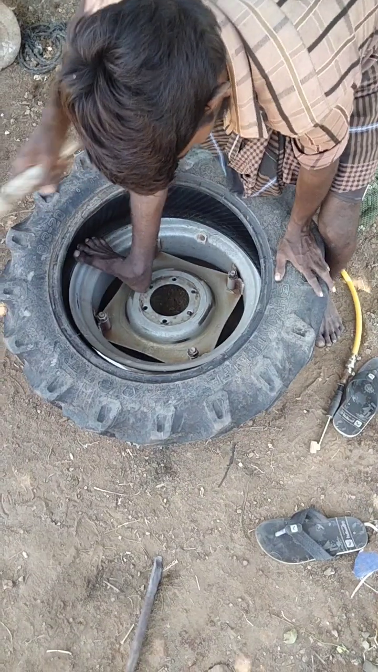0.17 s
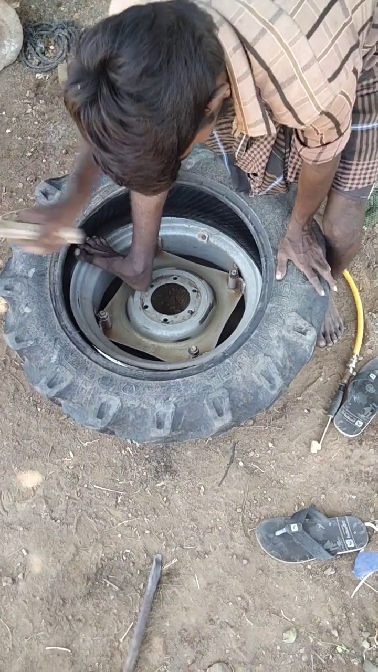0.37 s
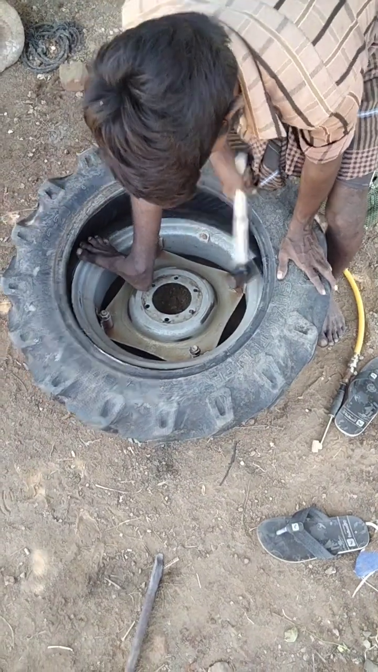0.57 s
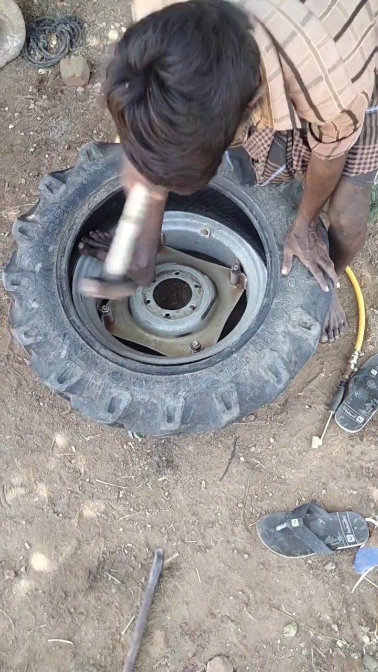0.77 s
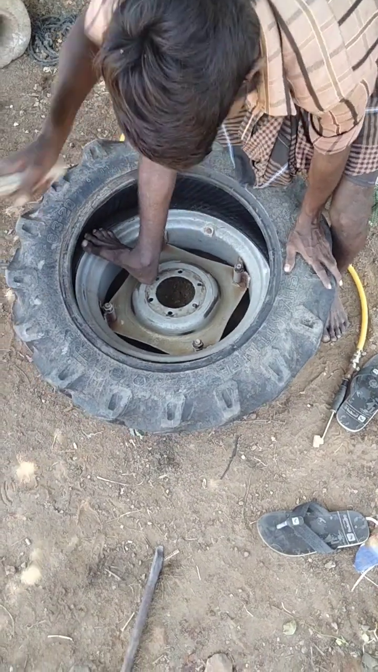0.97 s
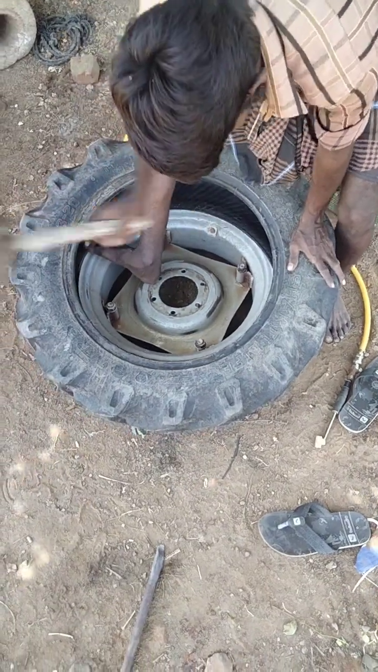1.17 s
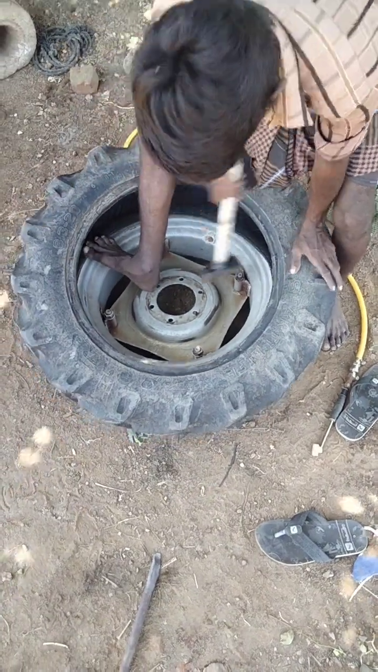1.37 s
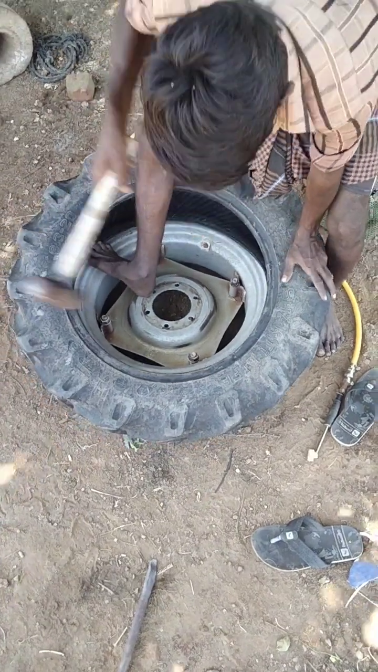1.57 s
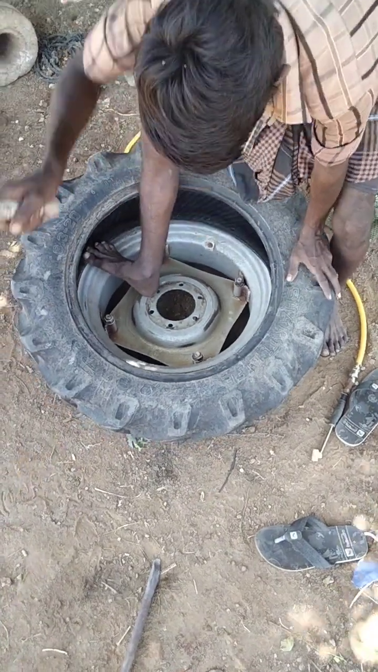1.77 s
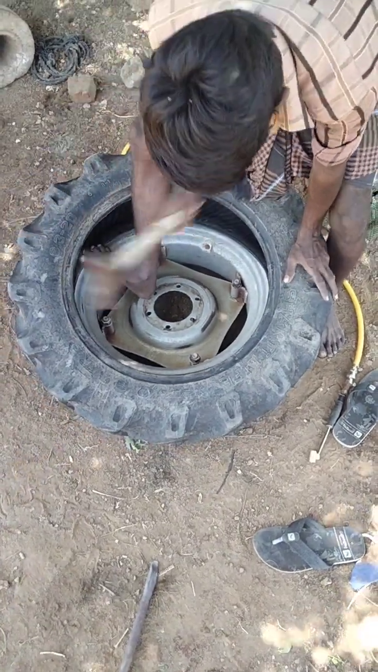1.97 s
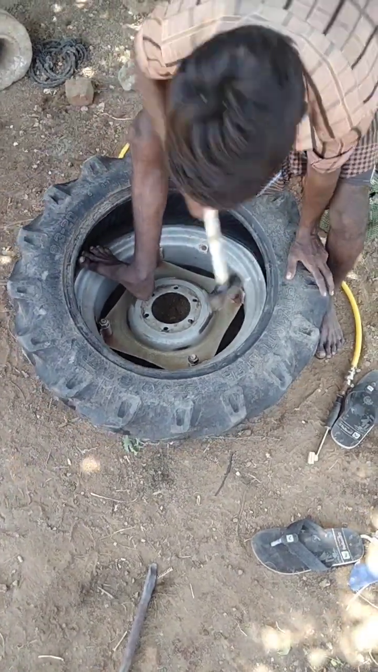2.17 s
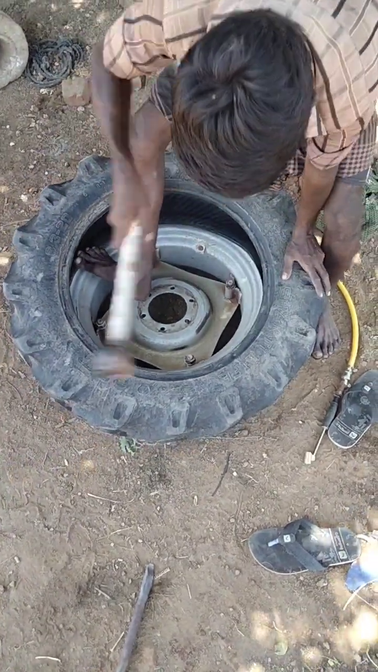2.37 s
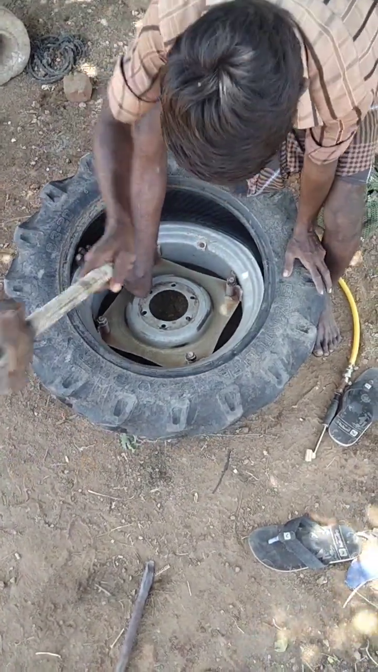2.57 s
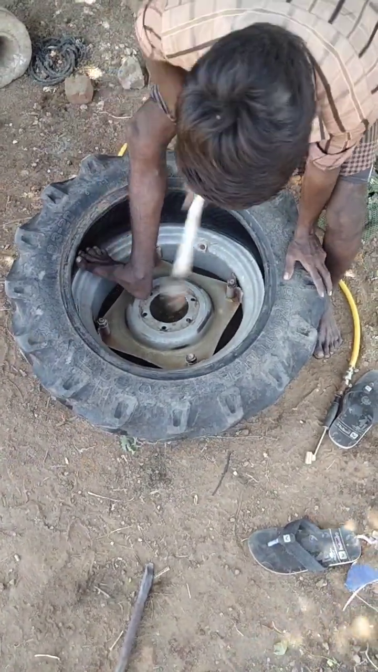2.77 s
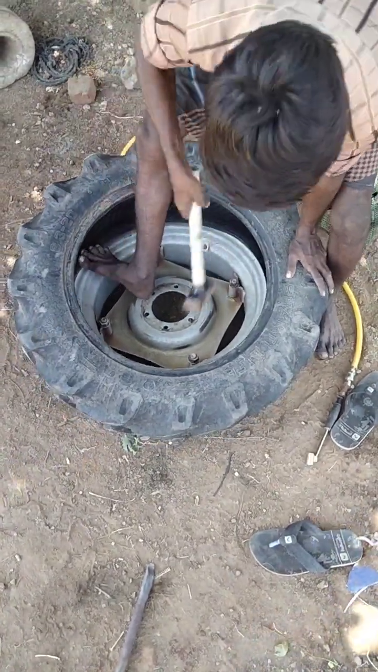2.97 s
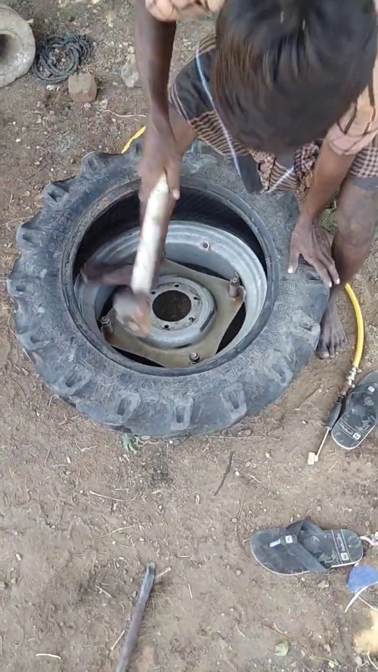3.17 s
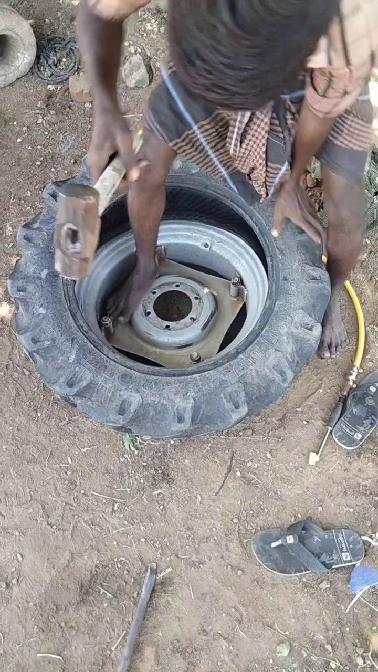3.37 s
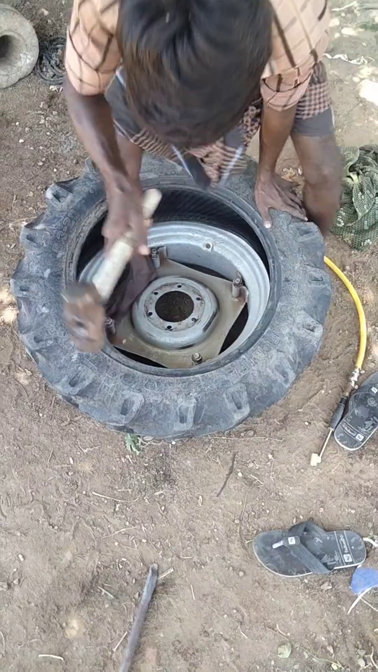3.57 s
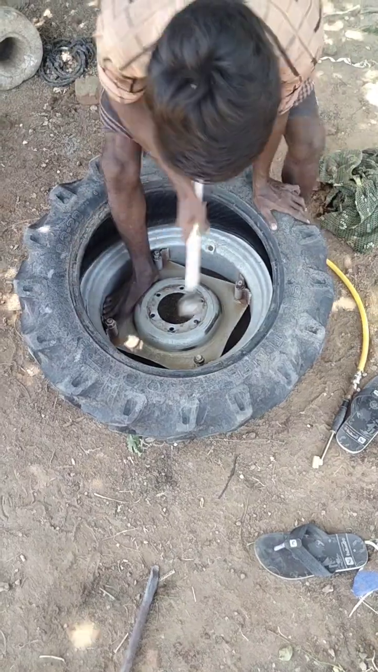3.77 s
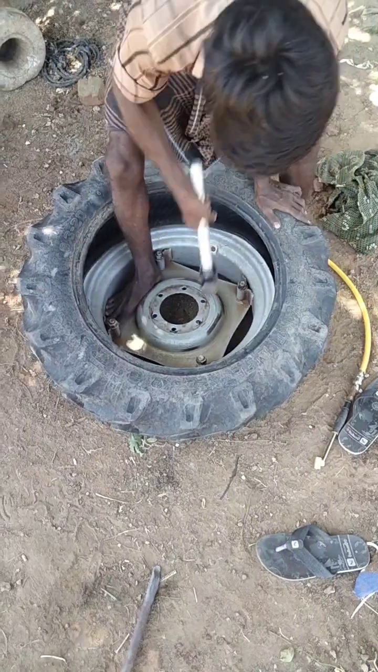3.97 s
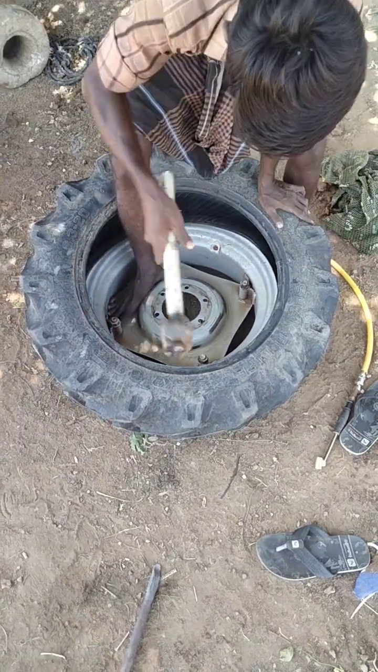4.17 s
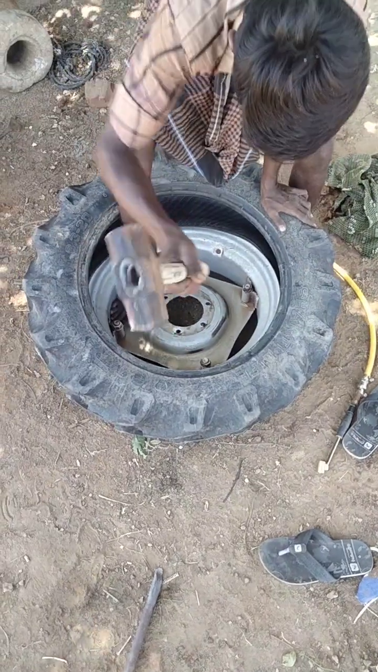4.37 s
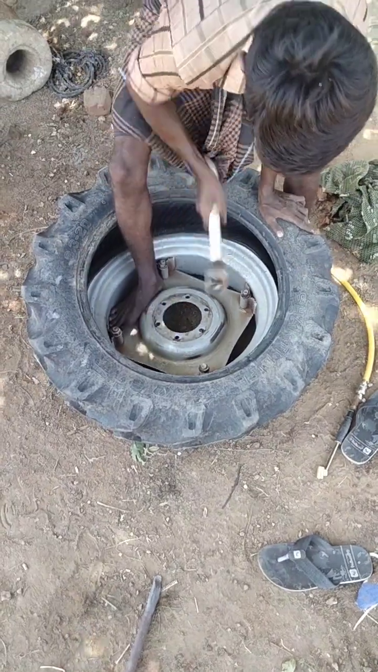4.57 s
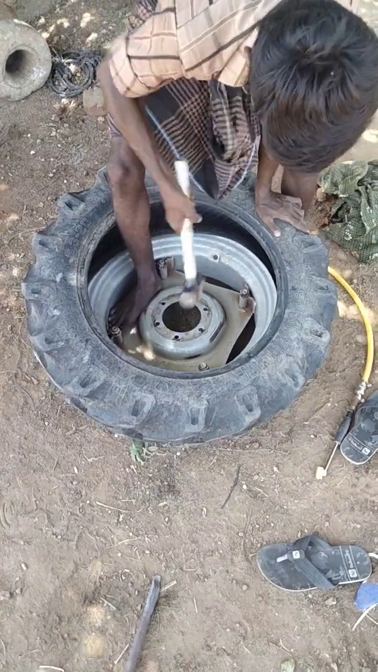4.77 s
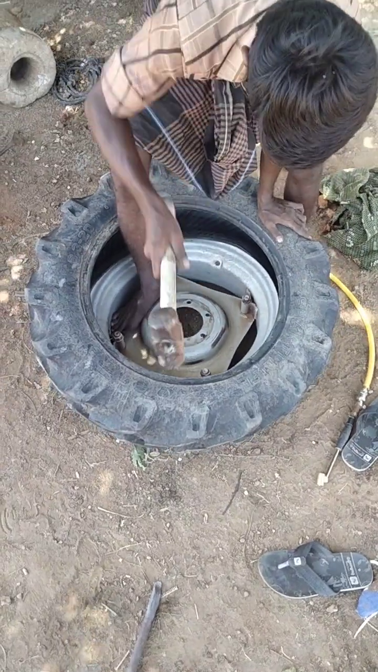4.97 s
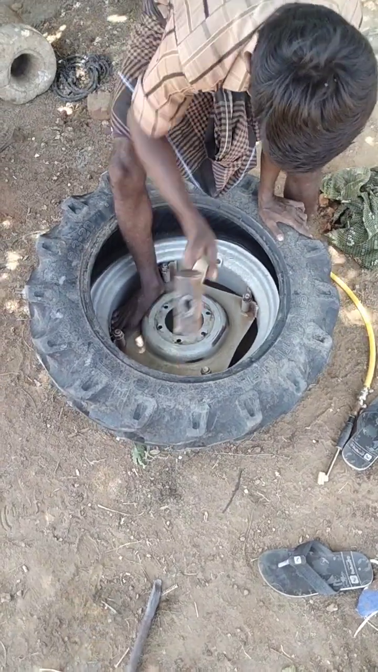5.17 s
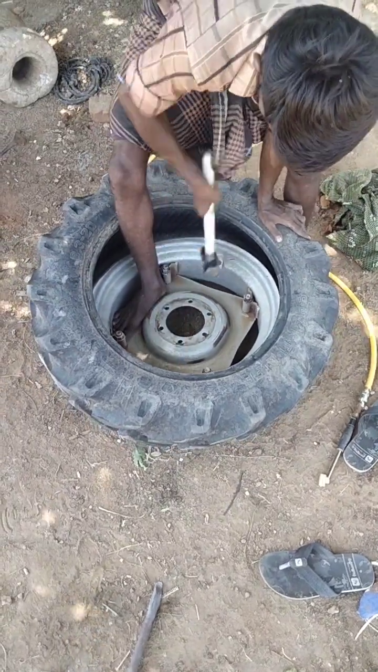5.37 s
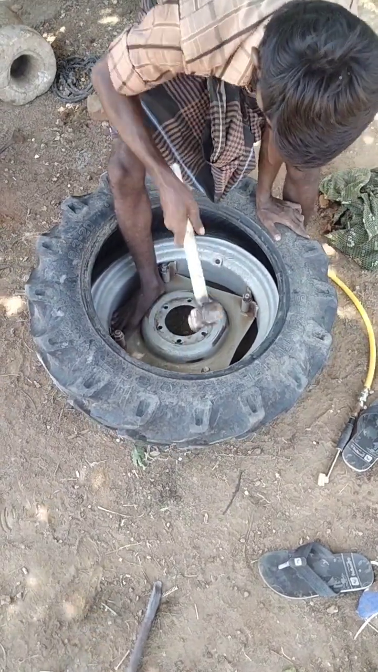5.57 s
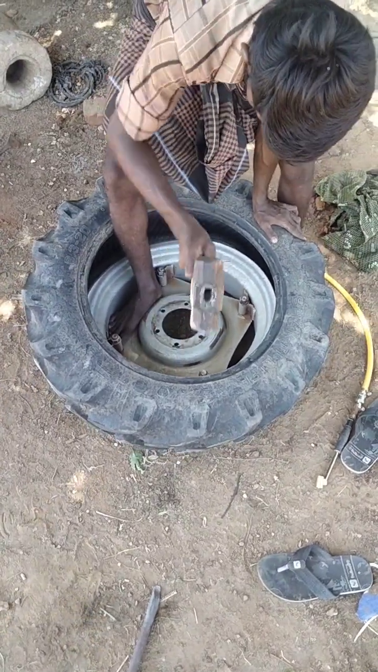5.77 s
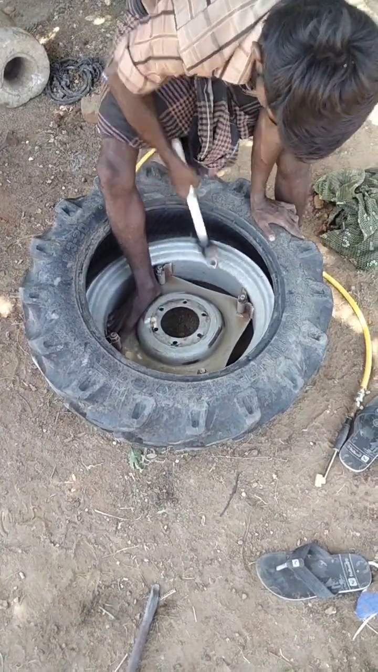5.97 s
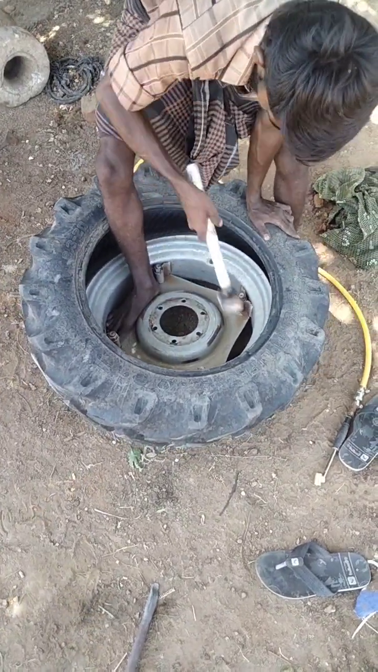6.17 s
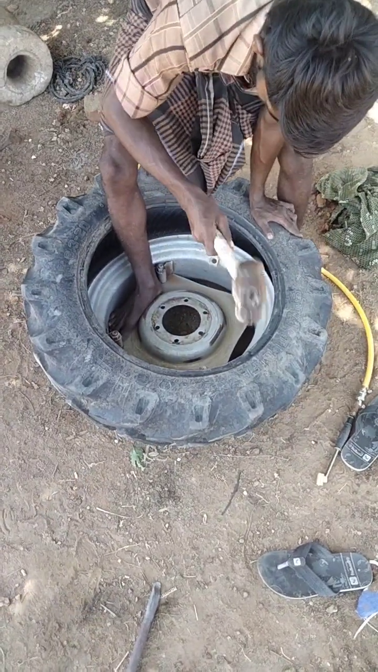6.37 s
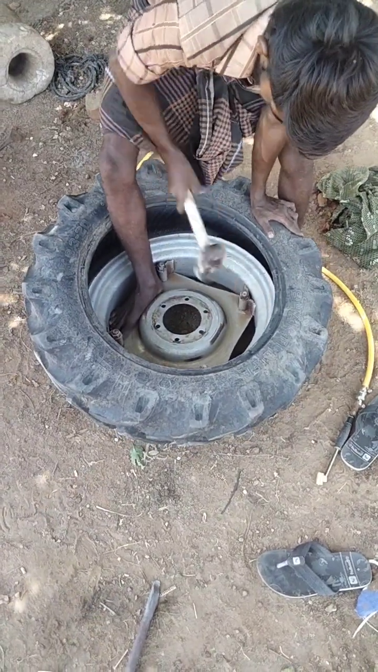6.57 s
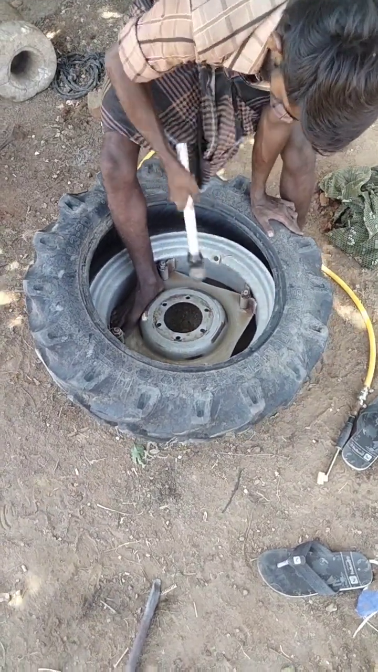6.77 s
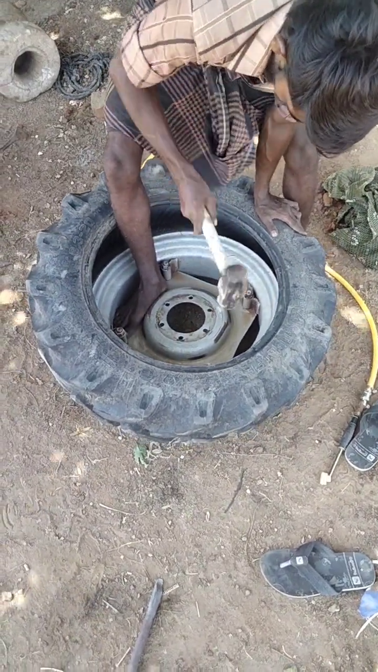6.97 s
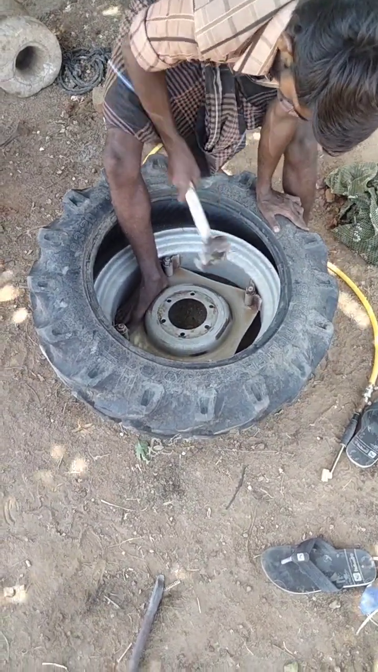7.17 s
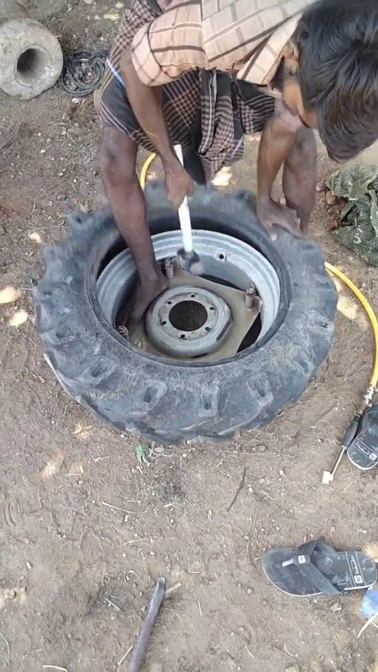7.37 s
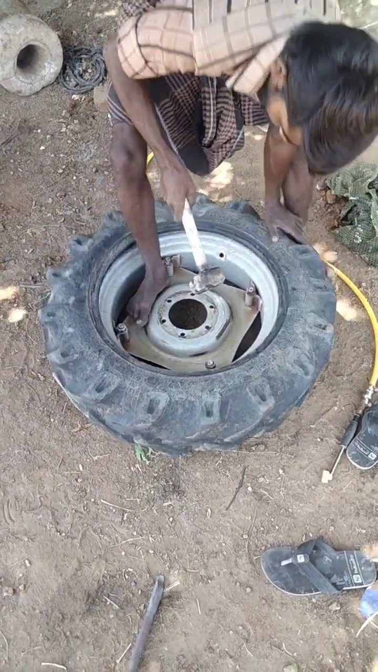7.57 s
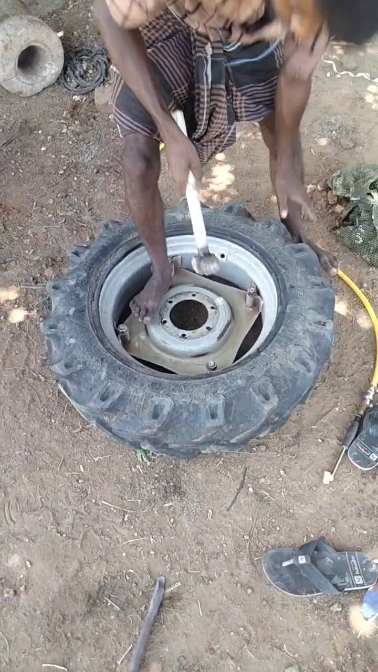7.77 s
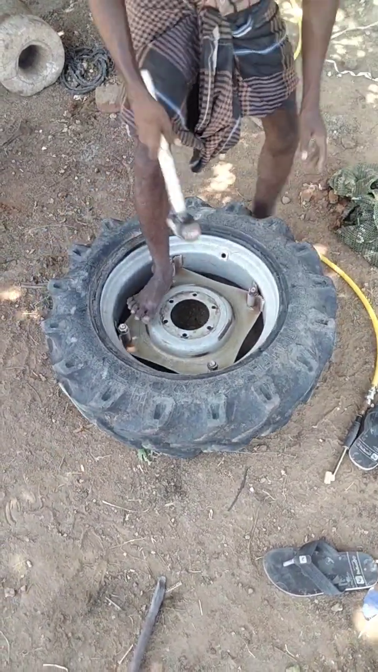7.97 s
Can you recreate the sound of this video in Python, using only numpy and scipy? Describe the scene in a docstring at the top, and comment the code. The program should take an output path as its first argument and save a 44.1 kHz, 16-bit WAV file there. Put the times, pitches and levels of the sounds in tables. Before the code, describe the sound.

A heavy hammer strikes a steel tractor wheel close to the microphone in an open yard. Four blows land at about 0.7, 1.5, 2.2 and 3 seconds, and after a slightly longer gap six more at 4, 4.8, 5.5, 6.1, 6.8 and 7.4 seconds. Each is a solid thud with a clank and a short ring that the tyre quickly damps. The blows near 3, 4.8 and 5.5 seconds ring most, while those at 4 and 6.1 are duller. Grit hisses briefly in the rim, mainly near 2.3 and 6.1 seconds. From 7.6 to 7.8 seconds the hammer is set down with a quick cluster of dull knocks. Throughout, a distant one-cylinder engine drones and ticks quietly, and leaking air makes a faint, high, wavering whistle. Light wind rumbles on the microphone, with gusts just after 2 seconds and around 5 seconds.

```python
"""In a breezy workshop yard, a heavy hammer knocks at the rim of a tractor wheel lying on the ground.
Each blow shoves the wheel with a thud, then the steel clanks and rings until the tyre damps it.
Grit slides in the rim, and a few dull knocks follow as the hammer is set down.
A one-cylinder engine runs some way off, leaking air whistles and gusts buffet the microphone.
A limiter flattens the loud peaks of the blows."""
import sys
import numpy as np
from scipy import signal
from scipy.fft import rfft, irfft
from scipy.io import wavfile
from scipy.ndimage import uniform_filter1d, minimum_filter1d

SR = 44100
rng = np.random.default_rng(int(sys.argv[2]) if len(sys.argv) > 2 else 0)


def wrap_up_sound(samples):
    """Save the sound to the file named by the first command line argument, as 16-bit audio."""
    columns = np.atleast_2d(samples).T
    # keep every value between -1 and 1, then stretch to whole-number steps
    tamed = np.clip(columns, -1, 1)
    steps = np.round(tamed * 32767).astype(np.int16)
    wavfile.write(sys.argv[1], SR, steps)


N = 353814
TIME = np.arange(N) / SR


def amp(db):
    """Turns decibels into a gain."""
    return 10 ** (np.asarray(db) / 20)


def unit_rms(x):
    """Scales a sound to an average level (rms) of 1."""
    return x / np.sqrt(np.mean(x ** 2) + 1e-20)


def add(mix, start_s, sound):
    """Lays a sound into the mix."""
    part = mix[round(start_s * SR):][:len(sound)]
    part += sound[:len(part)]


def gain_at(shape, hz):
    """Reads gains off a curve of (Hz, dB) points."""
    points_hz, db = np.transpose(shape)
    return amp(np.interp(np.log(hz + 1), np.log(points_hz), db))


def noise(shape, size=N):
    """Noise of rms 1, coloured by a curve of (Hz, dB) points."""
    gains = gain_at(shape, np.fft.rfftfreq(size, 1 / SR))
    return unit_rms(irfft(rfft(rng.standard_normal(size)) * gains, size))


def pitched_noise(hz, width_hz):
    """Noise of rms 1, gathered around one pitch."""
    offset = (np.fft.rfftfreq(N, 1 / SR) - hz) / width_hz
    return unit_rms(irfft(rfft(rng.standard_normal(N)) / (1 + 2 * offset ** 2), N))


# Steady air with the leak's hiss. Each row: frequency in Hz, relative level in dB.
AIR_SHAPE = [(25, 0.5), (90, -1.5), (170, -21), (280, -29), (550, -10), (950, -20.5), (1300, -24),
             (3700, -26.5), (4600, -34), (6500, -28), (8200, -23.5), (9200, -28), (11000, -32.5),
             (15500, -33.5)]
# Wind rumble on the microphone. Each row: frequency in Hz, relative level in dB.
RUMBLE_SHAPE = [(20, 2.5), (50, -2.5), (110, -5.5), (200, -12.5), (320, -19.5), (700, -64)]
# Gusts. Each row: time of the peak in seconds, rough length in seconds, strength in dB.
WIND_GUSTS = [(2.164, 0.13, -34.5), (2.432, 0.12, -32), (5.025, 0.86, -30), (5.357, 0.18, -36)]

def yard_air(air_db=-42.0, calm_db=-41.5, lumpy_db=3):
    """Open air, and lumpy gusts that rise out of a light breeze and buffet the microphone."""
    lumps = noise([(1, -4), (8, -4), (25, 6), (200, -100)])
    gusts = sum(amp(db) * np.exp(-2 * np.pi * ((TIME - peak) / length) ** 2)
                for peak, length, db in WIND_GUSTS)
    wind = (amp(calm_db) + gusts) * amp(lumpy_db * (lumps - .5))
    return amp(air_db) * noise(AIR_SHAPE) + wind * noise(RUMBLE_SHAPE)


# The whistle's tones. Each row: pitch in Hz, width in Hz, typical level in dB.
WHISTLE_TONES = [(8112, 49, -48), (8650, 120, -63), (8490, 31, -60), (4886, 50, -71)]
# Its rise and fall. Each row: time in seconds, relative strength in dB before scaling by `swell`.
WHISTLE_SWELLS = [(0.0, -50), (0.85, -56), (1.14, -47.5), (1.63, -56.5), (2.01, -49.5), (2.3, -55.5),
                  (4.8, -50.5), (5.63, -52), (5.92, -55), (6.99, -52.5), (7.17, -48.5), (8.02, -53)]

def air_leak(flutter_db=0.96, swell=0.82):
    """Escaping air makes a thin, unsteady whistle."""
    slow_db = np.interp(TIME, *np.transpose(WHISTLE_SWELLS))
    flutter = noise([(1, 5), (12, 22), (40, -22), (200, -90)])
    strength = amp(swell * (slow_db - slow_db.mean()) + flutter_db * flutter)
    return strength * sum(amp(db) * pitched_noise(hz, width) for hz, width, db in WHISTLE_TONES)


# The exhaust's drone. Each row: frequency in Hz, relative level in dB.
EXHAUST_SHAPE = [(50, 11), (100, -16), (170, -31), (220, 2), (370, 3), (540, 0.5), (620, -12), (950, -1.5),
                 (1150, -17.5), (1800, -36)]
# Its strongest tones. Each row: multiple of the engine speed, level in dB.
STRONG_HARMONICS = [(17, -53.5), (19, -55), (24, -49), (30, -53.5), (38, -54.5), (76, -58.5)]
# Valve ticks. Each row: place in the turn from 0 to 1, pitch in Hz, width in Hz, level in dB,
# fade time in seconds.
VALVE_TICKS = [(0, 2140, 200, -53, 0.0069), (0.2, 2160, 160, -56.5, 0.0056), (0, 9890, 420, -55.5, 0.012),
               (.01, 13500, 1300, -60, .009), (0.01, 5700, 9400, -53, 0.003)]

def engine(turns_per_s=12.33, exhaust_db=-46.5, wander_turns=0.0036):
    """One distant cylinder: echoes smear its beat into a drone, and the valves tick on every turn."""
    drift = noise([(.5, 12.5), (2, -10.0), (6, -51), (30, -140)])
    turns = turns_per_s * TIME + .11 + wander_turns * drift
    multiples, size = np.arange(2049), 4096
    harmonics = gain_at(EXHAUST_SHAPE, multiples * turns_per_s) * (multiples > 2) * (multiples < 150)
    harmonics *= amp(exhaust_db) / np.linalg.norm(harmonics)
    for multiple, db in STRONG_HARMONICS:
        harmonics[round(multiple)] = amp(db)
    phases = np.exp(2j * np.pi * rng.random(len(harmonics)))
    one_turn = irfft(harmonics * phases) * size / np.sqrt(2)
    out = np.interp(turns % 1, np.arange(size) / size, one_turn, period=1)
    for place, hz, width, db, fade_s in VALVE_TICKS:
        count, since_tick = np.divmod(turns - place + 1, 1)
        force = amp(db + 0.77 * rng.standard_normal(int(count.max()) + 1))[count.astype(int)]
        age = since_tick / turns_per_s / fade_s
        out += force * np.sqrt(age) * np.exp(1 - age) * pitched_noise(hz, width)
    return out


# Grit sliding in the rim. Each row: start in seconds, length in seconds, level in dB.
GRIT_SLIDES = [(2.25, .07, -44), (3.5, .12, -50), (6.13, .07, -40), (7.57, .08, -51)]

def grit():
    """Sand shaken loose makes short hisses."""
    out = np.zeros(N)
    for start, length, db in GRIT_SLIDES:
        size = int(length * SR)
        hiss = noise([(1000, -6), (5000, 0.5), (15000, -13.0)], size)
        add(out, start, amp(db) * hiss * np.hanning(size))
    return out


def spot_gain(hz, spot_hz, boost=2.6, width=.08):
    """Tones that move the steel most at the struck spot take more of the force."""
    return 1 + sum(boost / (1 + (np.log((hz + 1) / centre) / width) ** 2) for centre in spot_hz)


# The wheel's clear tones. Each row: pitch in Hz, relative level in dB, seconds to fade by 60 dB.
WHEEL_TONES = [(110, -4, .18), (165, 0, .13), (240, -7, .14), (335, -5, .13), (400, -8, .11), (472, 0, .18),
               (535, -2.5, .23), (617, -7, .16), (795, -9, .14), (924, -19, .8), (1002, -4, .18),
               (1206, -4, .14), (1322, .5, .15), (1914, -4, .2), (2393, 0, .19), (2692, -5, .28),
               (2812, -1, .18), (3246, -4, .2), (3900, -10, .3), (5040, -2, .13), (5520, -3, .13),
               (6056, -5, .16), (6620, -5, .15), (7205, -2, .19), (7835, -1, .16), (8470, -1, .19)]
# The steel's wash of crowded tones. Each row: frequency in Hz, relative level in dB.
WASH_SHAPE = [(100, 44.5), (600, 6), (760, -0.5), (1300, 2.5), (1700, 7), (3000, 9.5), (4000, 7),
              (5200, 6.5), (8500, 0), (10500, -17.5), (15000, -19.5)]

def ring(t, spot_hz, low_hz, high_hz, wash_fade_s, wash_db, scatter_db=2, ripple_db=6.5):
    """One part of the wheel rings: clear tones in a wash of crowded ones, rms 1 over the first 50 ms."""
    onset, hz = slice(SR // 20), np.fft.rfftfreq(len(t), 1 / SR)
    clear = np.zeros(len(t))
    for tone_hz, db, fade_s in WHEEL_TONES:
        if low_hz <= tone_hz < high_hz:
            force = spot_gain(tone_hz, spot_hz) * amp(db + scatter_db * rng.standard_normal())
            clear += force * amp(-60 * t / fade_s) * np.sin(2 * np.pi * (tone_hz * t + rng.random()))
    # the wash bunches into narrow peaks, new ones for every strike
    peaks = amp(ripple_db * unit_rms(uniform_filter1d(rng.standard_normal(len(hz)), size=14)))
    phases = np.exp(2j * np.pi * rng.random(len(hz)))
    wash = irfft(gain_at(WASH_SHAPE, hz) * spot_gain(hz, spot_hz) * peaks * phases, len(t))
    band = signal.butter(3, [low_hz, min(high_hz, .45 * SR)], "band", fs=SR, output="sos")
    wash = signal.sosfilt(band, wash) * amp(-60 * t / wash_fade_s)
    both = clear / (clear[onset].std() + 1e-9) + amp(wash_db) * wash / wash[onset].std()
    both *= 1 - np.exp(-t * min(low_hz, 1500))  # low tones take longer to build up
    return both / both[onset].std()


def thud(t, hz, peak_cycles=.62, sharpness=2.1):
    """The hammer shoves the whole wheel, and the air swings about twice."""
    age = hz * t / peak_cycles
    return -np.sin(2 * np.pi * hz * t) * (age * np.exp(1 - age)) ** sharpness


# The ringing parts: tyre, disc, then four of the rim. Each row: lowest and highest pitch in Hz,
# seconds for the wash to fade by 60 dB, its level against the clear tones in dB.
WHEEL_PARTS = [(84.5, 440, 0.048, 1.5), (316, 690, 0.28, -5), (691.4, 1330, 0.17, 1),
               (1450, 4100, 0.2, 4.5), (4500, 9500, 0.18, 4.5), (9800, 21300, 0.23, 0)]

def strike(thud_db, thud_hz, clank_delay_s, spot_hz, ring_db, struck_boost_db=5.5):
    """A thud, joined within milliseconds by the boom of tyre and disc and a steel clank."""
    t = np.arange(SR // 2) / SR
    struck = [low <= spot_hz[1] < high for low, high, *_ in WHEEL_PARTS]
    tyre, disc, *rim = (amp(db + struck_boost_db * hit) * ring(t, spot_hz, *part)
                        for db, hit, part in zip(ring_db, struck, WHEEL_PARTS))
    crack = 5.9 * np.exp(-clank_delay_s / 0.0023)  # a late contact has lost speed and cracks less
    snap = (1 + crack * np.exp(-t / 0.0039)) / np.sqrt(1 + crack)
    out = amp(thud_db) * thud(t, thud_hz)
    add(out, 0.00058, amp(thud_db - 12) * thud(t, 1.9 * thud_hz))  # a quicker, sharper knock rides on the thud's start
    add(out, 0.864 / thud_hz, tyre)
    add(out, 0.002, disc)
    add(out, clank_delay_s, sum(rim) * snap)
    return out


# Dull knocks. Each row: start in seconds, thud level in dB, thud pitch in Hz, tyre boom in dB,
# clank in dB.
SOFT_KNOCKS = [(7.557, -14, 243, -32.5, -36), (7.609, -20, 286, -33, -35.5), (7.6189, -3.5, 157, -23, -31),
               (7.665, -11.5, 167, -27, -33), (7.755, -22, 190, -48, -67), (7.798, -29, 167, -32, -46)]
# One value for the disc and each rim part: dB added to a knock's clank.
STEEL_OFFSETS_DB = [-1.5, -5.5, -17.5, -35, -27]

def hammer_set_down(clank_delay_s=.003):
    """The hammer head bumps softly on the wheel: mostly tyre, little steel."""
    out = np.zeros(N)
    for start, thud_db, thud_hz, boom_db, clank_db in SOFT_KNOCKS:
        ring_db = [boom_db] + [clank_db + db for db in STEEL_OFFSETS_DB]
        spot_hz = (0.71 * thud_hz, 800)
        add(out, start, strike(thud_db, thud_hz, clank_delay_s, spot_hz, ring_db))
    return out


# How the wheel's parts answer a blow, tyre first. Each row: base level in dB, dB gained per dB of
# clank, dB gained per dB of bite (the bright edge of steel on steel).
PART_RESPONSES = [(-29.3, 0, 0), (-8.3, .44, 0), (-9, 0.71, 0), (-.5, 1.15, 0), (-.7, 0, 1), (0, 0, 1)]
# The blows. Each row: start in seconds, thud level in dB, thud pitch in Hz, clank delay in seconds,
# low and high pitch in Hz that the struck spot favours, clank in dB, bite in dB.
HAMMER_BLOWS = [(0.7227, -2.5, 430, 0.0081, 169, 2480, -45, -46.5),
                (1.4638, -3.5, 434, 0.0089, 405, 1325, -31.5, -40),
                (2.2224, -7, 393, 0.0064, 613, 5130, -42, -56),
                (2.9858, -1, 410, .0062, 500, 1170, -23, -39.5),
                (4.011, -5, 374, .0042, 169, 720, -48, -51),
                (4.7686, -9.5, 308, 0.0033, 484, 980, -23, -29.5),
                (5.4592, -13, 340, .0028, 460, 3900, -28, -25.5),
                (6.1287, -7, 155, 0.0018, 327, 740, -48.5, -51),
                (6.7882, -15, 200, 0.0021, 490, 960, -37.5, -32.5),
                (7.4011, -7.5, 162, 0.0073, 490, 2370, -31, -32)]

def hammer_blows(press_hz=150, press_db=-17):
    """Each heavy blow sets the wheel ringing and presses it down on its tyre."""
    out, t = np.zeros(N), np.arange(SR // 2) / SR
    press = amp(press_db) * thud(t, press_hz)
    for start, thud_db, thud_hz, delay, low_hz, high_hz, clank_db, bite_db in HAMMER_BLOWS:
        ring_db = [db + by_clank * clank_db + by_bite * bite_db
                   for db, by_clank, by_bite in PART_RESPONSES]
        add(out, start, press + strike(thud_db, thud_hz, delay, (low_hz, high_hz), ring_db))
    return out


def scene():
    """Everything reaches one microphone above the wheel."""
    return (hammer_blows() + hammer_set_down() + grit() + engine() + air_leak() + yard_air())[None]


def record(dry, ceiling=.5, hold_s=0.089, release_s=0.0041, top_hz=15850):
    """A limiter turns down just before each loud peak, holds and lets go; filters trim lows and highs."""
    sound = signal.sosfilt(signal.butter(2, 18, "high", fs=SR, output="sos"), dry[0])
    hold = 2 * int(hold_s * SR / 2) + 1
    needed_gain_db = -20 * np.log10(np.maximum(abs(sound) / ceiling, 1))
    cut_db = -minimum_filter1d(needed_gain_db, hold, origin=hold // 2)
    fade = TIME / release_s
    cut_db = np.exp(np.maximum.accumulate(np.log(cut_db + 1e-9) + fade) - fade)  # let go smoothly
    gain_db = uniform_filter1d(minimum_filter1d(-cut_db, size=201), size=201)  # look ahead
    low_pass = signal.firwin(511, top_hz, window=("kaiser", 9), fs=SR)
    return signal.oaconvolve(sound * amp(gain_db), low_pass, "same")[None]


dry = scene()
out = record(dry)
wrap_up_sound(out)
```